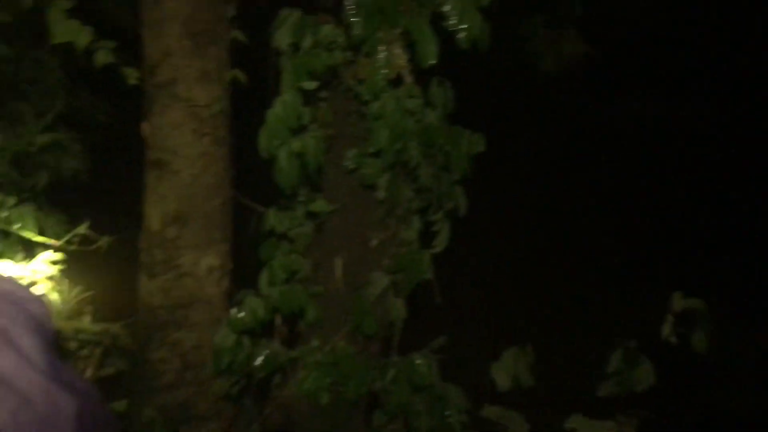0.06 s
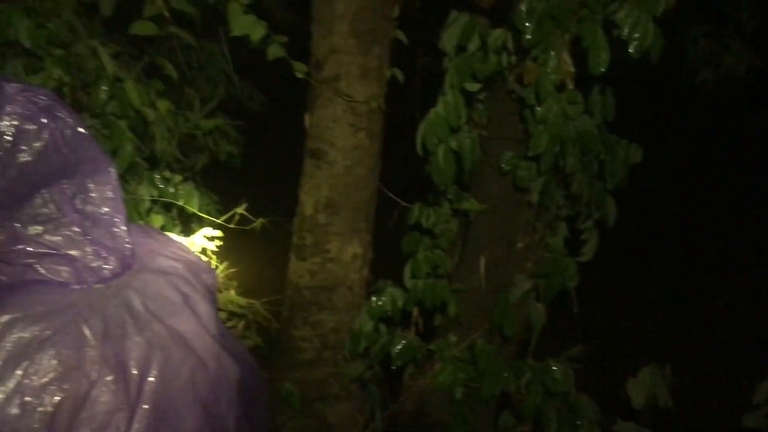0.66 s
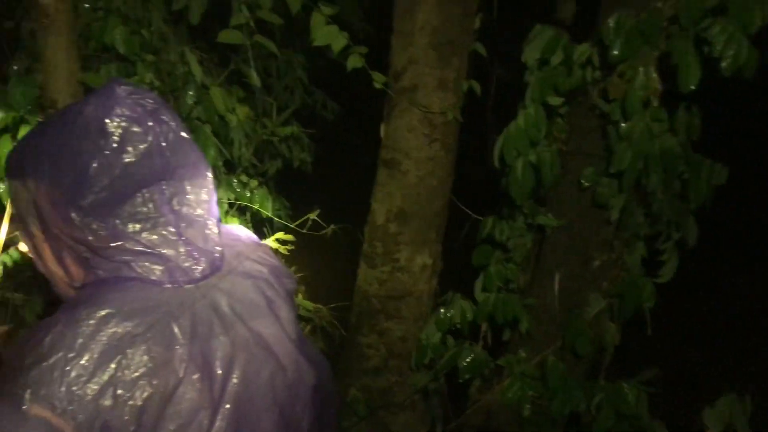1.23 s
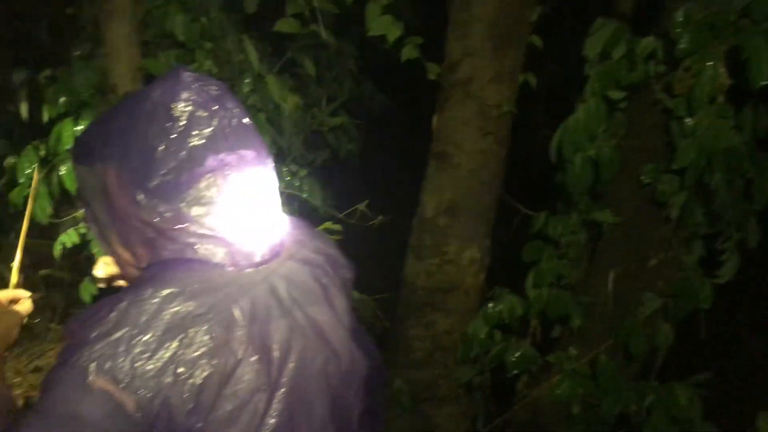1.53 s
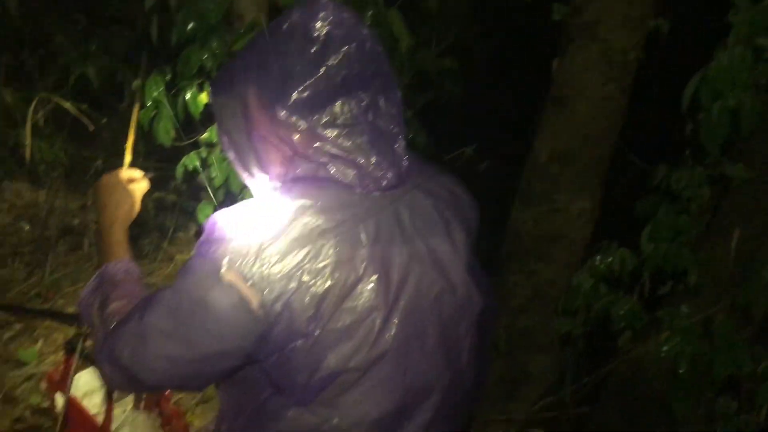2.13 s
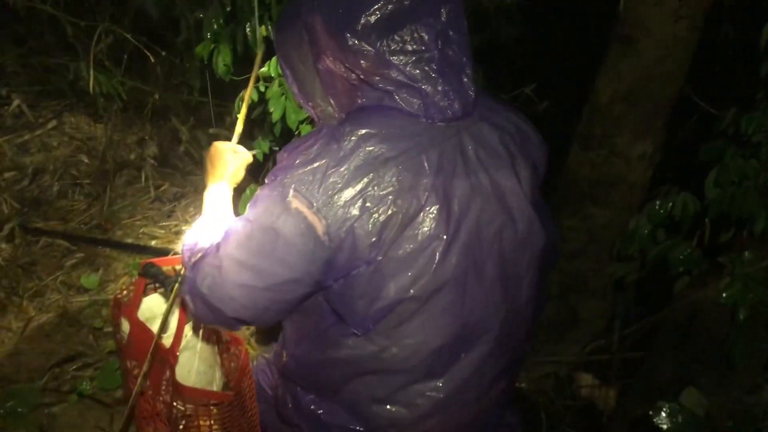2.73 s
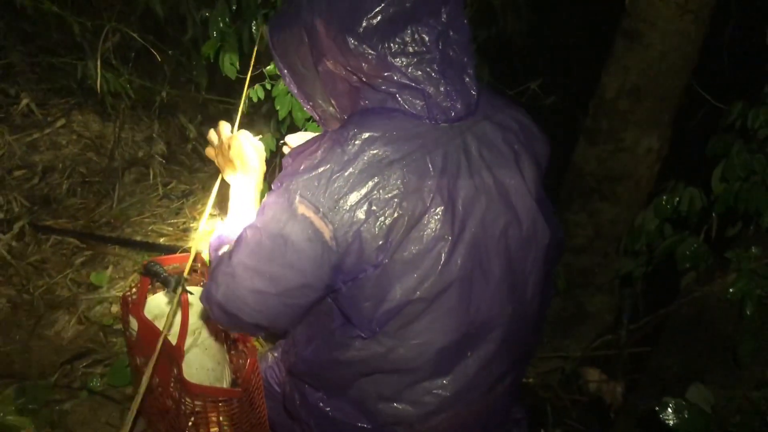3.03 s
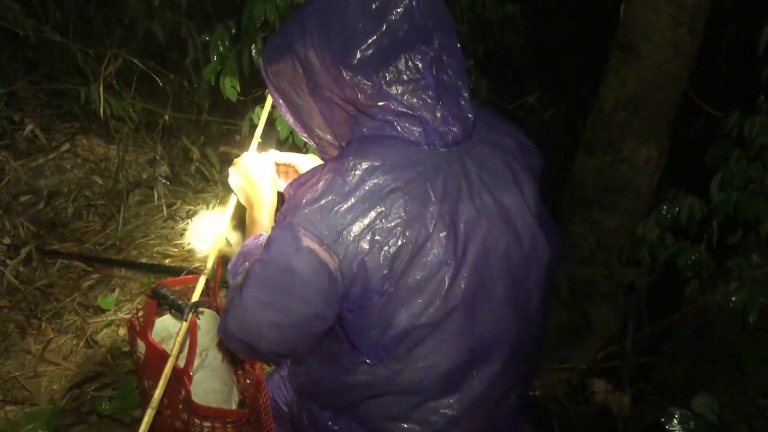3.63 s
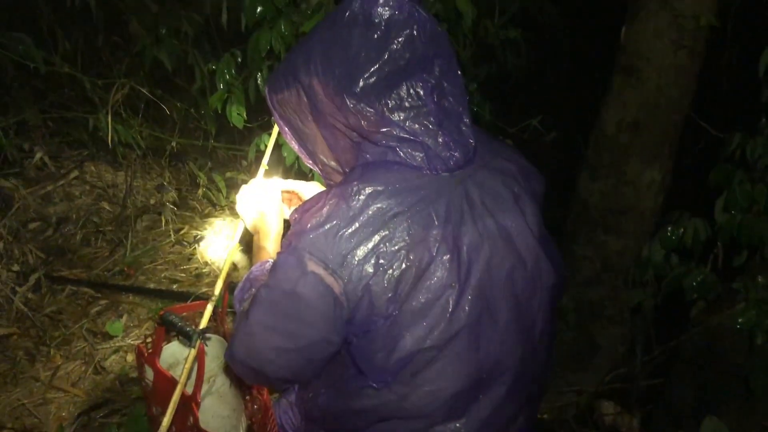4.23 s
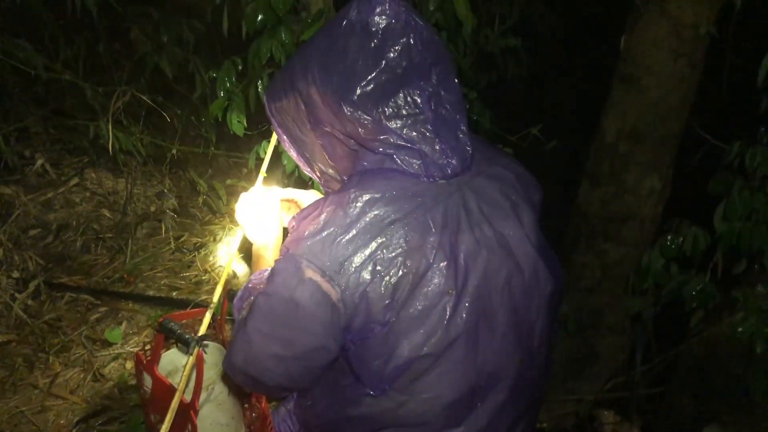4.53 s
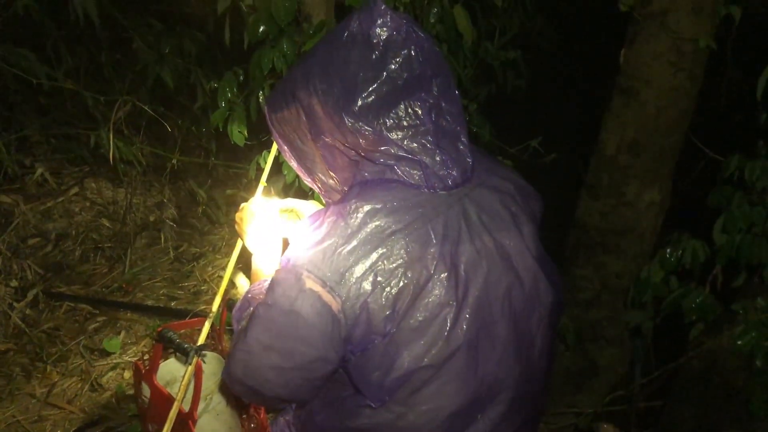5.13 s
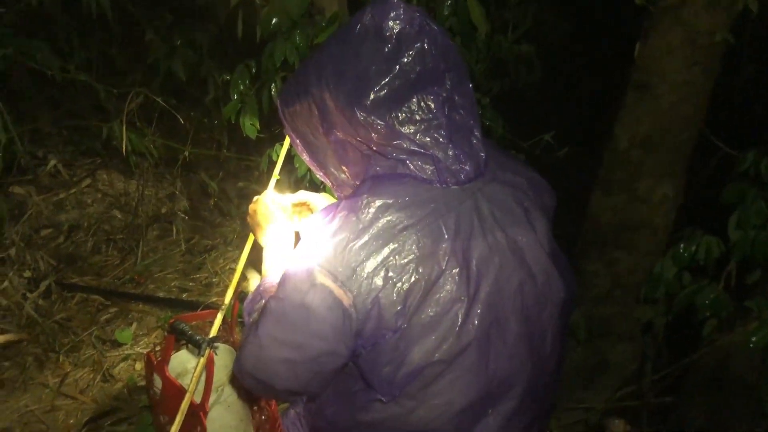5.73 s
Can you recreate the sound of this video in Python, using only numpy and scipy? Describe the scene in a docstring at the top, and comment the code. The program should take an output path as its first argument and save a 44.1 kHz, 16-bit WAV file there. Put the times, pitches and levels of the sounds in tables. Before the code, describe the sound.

Small frogs call throughout in a wood at night, with fast trills, high chirps about five times a second and scattered hoarse peeps, all echoing slightly off the trees. Behind them are a soft hiss of light rain, a far frog chorus, faint insects and a low hum. Close by, drops tap a plastic raincoat, tick on leaves and plink in puddles, and creases in the plastic snap now and then. Soft bumps come between 1 and 2 seconds, and a sleeve rustles from about 2.2 to 2.9 seconds. The trills grow stronger and nearly unbroken from 2.7 seconds. A firm tap lands on the plastic at 3.3 seconds. At 4.2 seconds a heavy drop cracks beside the microphone, the loudest sound, and everything dips for an instant. Dull low thuds cluster from 5.2 to 5.8 seconds as the frogs carry on.

```python
"""A wood at night, in light rain. Small frogs trill, chirp and peep in short whistled notes that echo off
the trees, over a far chorus, insects and a low hum. Drips ring bubbles in puddles. Someone in a plastic
raincoat crouches close by: creases snap and rustle, drops tap the plastic and ring leaves, soft bumps
thud. One heavy drop cracks by the microphone and ducks its gain."""
import sys
import numpy as np
from scipy import signal
from scipy.fft import rfft, irfft
from scipy.io import wavfile

SR = 44100
rng = np.random.default_rng(int(sys.argv[2]) if len(sys.argv) > 2 else 0)


def transcribe(signal):
    """Save signal, clipped to [-1, 1], as a 16-bit WAV file at the path in sys.argv[1]."""
    frames = np.atleast_2d(signal).T
    limited = np.clip(frames, -1, 1)
    pcm = np.round(limited * 32767).astype(np.int16)
    wavfile.write(sys.argv[1], SR, pcm)


N = 259732
TIME = np.arange(N) / SR
TICK_LEAD_S = .000722  # contact ahead of its peak
# Level of the rain hiss, dipping after the heavy drop ducks the gain: time_s, relative_db
HISS_LEVEL = [(0.0, -48), (0.56, -47), (0.97, -49), (2.36, -46), (2.54, -48.5), (3.64, -48.5), (3.85, -47),
              (4.36, -50.5), (5.02, -48), (5.89, -49)]


def from_db(db):
    """Decibels to gain."""
    return 10 ** (np.asarray(db) / 20)


def rms_one(x):
    """Scale to unit power."""
    return x / np.sqrt(np.mean(x ** 2) + 1e-20)


def add(out, start_s, sound):
    """Mix a sound in at start_s."""
    at = int(round(start_s * SR))
    part = sound[max(-at, 0):max(N - at, 0)]
    out[max(at, 0):max(at, 0) + len(part)] += part


def in_time(curve):
    """Control curve at every sample."""
    return np.interp(TIME, *np.transpose(curve))


def drift(per_s):
    """Random wander through knots of spread 1."""
    knots = rng.standard_normal(1024)
    return np.interp(TIME * per_s, np.arange(len(knots)), knots)


def phase_of(hz):
    """Running phase of a pitch curve."""
    return 2 * np.pi * np.cumsum(hz) / SR


def colour(x, points):
    """Shape a spectrum, 41 dB per octave down beyond its ends; rms 1."""
    hz, db = np.transpose(points)
    octave, known = np.log2(np.arange(N // 2 + 1) * SR / N + 1), np.log2(hz)
    beyond = np.abs(octave - np.clip(octave, known[0], known[-1]))
    gain = from_db(np.interp(octave, known, db) - 41 * beyond)
    return rms_one(irfft(rfft(x) * gain, N))


def resonate(x, hz, width_hz):
    """Two-pole resonance."""
    r = np.exp(-np.pi * width_hz / SR)
    return signal.lfilter([1, 0, -1], [1, -2 * r * np.cos(2 * np.pi * hz / SR), r * r], x)


def grains(per_s, spread_db):
    """Random clicks, a few much larger than the rest."""
    sizes = from_db(spread_db * np.minimum(rng.exponential(1, N), 5)) * rng.choice([-1, 1], N)
    return sizes * (rng.random(N) < per_s / SR)


def dispersed(x, lag_s):
    """Bending waves in a thin sheet: delay, lag_s at 1 kHz, shrinks with the root of frequency."""
    root_hz = np.sqrt(np.fft.rfftfreq(len(x), 1 / SR) * 1000)
    return irfft(rfft(x) * np.exp(-4j * np.pi * lag_s * root_hz), len(x))


def ping(hz, q):
    """Narrow ring of one struck spot; peak 1."""
    width_hz = 2 * hz / q
    ring = resonate(resonate(signal.unit_impulse(SR // 40), hz, width_hz), hz, width_hz)
    return ring / np.abs(ring).max()


def fine_ping(spot, low_hz=5530, high_hz=15000):
    """High ring of a tiny spot; spot 0-1 sets the pitch."""
    return ping(low_hz * (high_hz / low_hz) ** spot, q=23)


def crackle(clicks, low_hz, high_hz, q, count):
    """Each click rings one of count facets, each with its own pitch; rms 1."""
    facet, out = rng.integers(0, count, N), np.zeros(N)
    for k, hz in enumerate(np.geomspace(low_hz, high_hz, count)):
        at = np.flatnonzero((facet == k) & (clicks != 0))
        ring = ping(hz, q)[:SR // 100]
        samples = np.minimum(at[:, None] + np.arange(len(ring)), N - 1)
        np.add.at(out, samples, clicks[at, None] * ring)
    return rms_one(out)


def tick(hz, width_hz, lag_s=.001384, soft_hz=2880):
    """A sharp contact rings a spot and spreads through the sheet; dull spots give more softly; peak 1."""
    ring = resonate(signal.unit_impulse(SR // 40), hz, width_hz)
    cushion = signal.butter(2, min(hz + soft_hz, .45 * SR), fs=SR, output="sos")
    sound = dispersed(signal.sosfilt(cushion, ring), lag_s)
    return sound / np.abs(sound).max()


def thud(mid_hz, length_s, fall):
    """Blow on a slack surface, quick ripples first; fall = first / last pitch; gone by 2 * length_s."""
    u = TIME[:int(2 * length_s * SR)] / length_s
    swell = u ** .41 * (1 - u / 2) ** 4
    pitch_hz = mid_hz / np.sqrt(fall) * (1 + (fall - 1) * np.exp(-3.9 * u))
    return swell / swell.max() * np.sin(phase_of(pitch_hz))


def among_trees(x, far_db, near_db, near_t60_s, far_t60_s=.41):
    """Ground and near trunks answer at once; the wood beyond scatters a longer tail."""
    t = TIME[:SR]
    decays = from_db(-60 * t / np.array([[near_t60_s], [far_t60_s]]))
    near, far = rng.standard_normal((2, SR)) * decays * (t > .003)
    echoes = (from_db(near_db) * rms_one(near) + from_db(far_db) * rms_one(far)) / np.sqrt(SR)
    return x + signal.fftconvolve(x, echoes)[:N]


def pulsed_calls(runs, note_s, uneven_db, waver_hz):
    """Even trains of short whistles, each sliding down ever faster."""
    out, u = np.zeros(N), np.linspace(0, 1, int(note_s * SR))
    swell, slide = np.sin(np.pi * u), .5 ** 1.5 - u ** 1.5
    for first_s, last_s, per_s, hz, db, fall_hz in runs:
        count = int(round((last_s - first_s) * per_s)) + 1
        for s in np.linspace(first_s, last_s, count):
            loud, sharp = rng.standard_normal(2)
            whistle = np.sin(phase_of(hz + waver_hz * sharp + fall_hz * slide))
            add(out, s - note_s / 2, from_db(db + uneven_db * loud) * swell * whistle)
    return out


def swells(moves):
    """Half-sine envelope for each movement."""
    return sum(from_db(db) * np.sin(np.pi * np.clip((TIME - start_s) / length_s, 0, 1))
               for start_s, length_s, db in moves)


def rain():
    """Countless drops on foliage merge into hiss and patter."""
    # Foliage spectrum: frequency_hz, relative_db
    spectrum = [(90, -1), (160, -1.5), (280, -8), (600, -7.5), (1000, -6.5), (1800, -8), (2900, -4.5),
                (3400, -4), (4100, -15.5), (4800, -17.5), (5500, -29), (7000, -26)]
    patter = rms_one(dispersed(grains(per_s=350, spread_db=3.4), lag_s=.003))
    level_db = in_time(HISS_LEVEL) + 4 + 1.13 * drift(25)
    return from_db(level_db) * colour(rng.standard_normal(N) + .5 * patter, spectrum)


def coat_crinkle():
    """Rain on the coat: hiss, and creases snapping in clumps at a wandering rate."""
    # Plastic spectrum: frequency_hz, relative_db
    spectrum = [(4000, 6), (5500, 1.5), (7000, -4), (8000, -5.5), (9000, -4.5), (10200, -7), (12500, -9.5),
                (15500, -6)]
    clumps = from_db(3 * np.clip(drift(70), -2, 1.6))
    clicks = grains(per_s=900 * from_db(4 * drift(9)), spread_db=3.2) * clumps
    creases = crackle(clicks, low_hz=4000, high_hz=15500, q=3, count=12)
    level_db = in_time(HISS_LEVEL) - 7.5 + .94 * drift(40)
    return from_db(level_db) * colour(rng.standard_normal(N) + np.sqrt(.5) * creases, spectrum)


def far_chorus(count=110, pulses_per_s=29.4, low_hz=3360, high_hz=3786, fall_hz=260):
    """Far frogs trill at random, each on its own pitch, over a blur of countless more."""
    # Chorus spectrum: frequency_hz, relative_db
    spectrum = [(3000, -7), (3250, -13), (3500, 0.5), (3700, -0.5), (3830, -4.5), (3950, -6)]
    # Swell and ebb: time_s, relative_db
    levels = [(0.0, -50), (0.23, -45.5), (0.79, -51.5), (1.2, -45.5), (1.54, -45), (2.56, -45), (3.08, -42),
              (4.82, -49.5), (5.89, -37.5)]
    runs = []
    for when, length, pitch in rng.random((count, 3)):
        end_s, hz = when * N / SR, low_hz + pitch * (high_hz - low_hz)
        runs.append((end_s - length / 2, end_s, pulses_per_s, hz, 0, fall_hz))
    calls = pulsed_calls(runs, note_s=.016, uneven_db=2, waver_hz=60)
    calls = rms_one(among_trees(calls, far_db=-3.5, near_db=-2.5, near_t60_s=.042))
    blur = rng.standard_normal(N)
    return from_db(in_time(levels) - 2) * colour(blur + from_db(8) * calls, spectrum)


def hum(pitch_hz=75):
    """Low wavering tone in a band of rumble."""
    # Rumble spectrum: frequency_hz, relative_db
    spectrum = [(25, -38), (50, -12.5), (66, -6.5), (75, 0), (86, -20), (110, -22)]
    # Hum strength: time_s, relative_db
    levels = [(0.0, -59.5), (2.23, -62.5), (2.92, -66), (3.44, -61), (4.25, -57), (4.33, -53), (5.15, -65),
              (5.35, -56), (5.68, -53), (5.89, -51)]
    drone = np.sqrt(2) * np.sin(phase_of(pitch_hz + 2 * drift(12))) * from_db(2 * drift(9))
    rumble = from_db(3) * colour(rng.standard_normal(N), spectrum)
    return from_db(in_time(levels) + 4) * (drone + rumble)


def insects():
    """Far stridulators merge into narrow, gently fluttering bands."""
    # Shrill bands: centre_hz, width_hz, level_db
    bands = [(5940, 310, -71.5), (7510, 360, -75), (8860, 860, -72.5)]
    out = np.zeros(N)
    for hz, width_hz, db in bands:
        band = resonate(resonate(rng.standard_normal(N), hz, width_hz), hz, width_hz)
        out += from_db(db + drift(22)) * rms_one(band)
    return out


def spatters(per_s=10):
    """Fine drops tick at random on leaves and hood."""
    out = np.zeros(N)
    for when, spot, chance in rng.random((int(per_s * N / SR), 3)):
        peak_db = -59.5 - 3.5 * np.log(max(chance, .02))
        add(out, when * N / SR, from_db(peak_db) * fine_ping(spot))
    return out


def chirping_frog(pitch_hz=4765, step_hz=50, fall_hz=850, note_gap_s=.0375, turned_s=2.9, t60_s=.25):
    """Three sliding notes a call; fainter and more blurred as the microphone turns away."""
    # Calling bouts: first_call_s, last_call_s, gap_s
    bouts = [(-.035, 0.352, .192), (0.578, 0.958, .192), (1.186, 1.455, .266), (1.646, 1.874, .229),
             (2.062, 2.451, .193), (2.671, 3.592, .229), (3.787, 4.454, .225), (4.655, 4.873, .225),
             (5.076, 5.722, .22)]
    # Sound arriving by way of the trees: time_s, power_share
    scattered = [(1.8, .2), (2.2, .7), (3.1, .92)]
    runs = []
    for first_s, last_s, gap_s in bouts:
        for call_s in np.linspace(first_s, last_s, int(round((last_s - first_s) / gap_s)) + 1):
            db = np.interp(call_s, [0, turned_s], [-45, -48.5])
            for k in (-1, 0, 1):
                s = call_s + note_gap_s * (1 + k)
                runs.append((s, s, 0, pitch_hz + k * step_hz, db - .1 * k, fall_hz))
    notes = pulsed_calls(runs, note_s=.019, uneven_db=1.3, waver_hz=100)
    notes = among_trees(notes, far_db=-16, near_db=-7, near_t60_s=.03)
    t = TIME[:SR // 2]
    echoes = rng.standard_normal(len(t)) * from_db(-60 * t / t60_s)
    blur = signal.fftconvolve(notes, echoes / np.linalg.norm(echoes))[:N]
    share = in_time(scattered)
    return np.sqrt(1 - share) * notes + np.sqrt(share) * blur


def puddle_drips(ring_s=.002, wobble=.06):
    """A trapped bubble rings briefly; its pitch wobbles and slides."""
    # Bubbles: start_s, relative_db, pitch_hz, rise_share
    bubbles = [(.013, -38, 2640, -0.019), (1.152, -38, 2740, -0.014), (1.317, -40, 2860, 0.21),
               (1.423, -37, 2780, 0.12), (1.681, -34, 2860, .04), (2.859, -39.5, 2880, .04),
               (4.912, -44, 2330, 0.0068), (5.103, -41, 1640, 0.022), (5.314, -38.5, 2950, -0.017)]
    out, u = np.zeros(N), TIME[:SR // 40] / ring_s
    for s, db, hz, rise in bubbles:
        pitch_hz = hz * (1 + rise * np.tanh(u / 2 - 1) + wobble * drift(1200)[:len(u)])
        add(out, s, from_db(db) * u * np.exp(1 - u) * np.sin(phase_of(pitch_hz)))
    return among_trees(out, far_db=-14, near_db=-5, near_t60_s=.047)


def trilling_frogs():
    """Fast trains of falling whistles among the trees."""
    # Trills: first_pulse_s, last_pulse_s, pulses_per_s, pitch_hz, relative_db, pulse_fall_hz
    runs = [(.032, .235, 29.5, 3490, -35, 260), (.165, .265, 30, 3740, -41, 100),
            (.515, .55, 30, 3720, -43, 100), (.972, 1.206, 29.9, 3440, -37, 300),
            (1.232, 1.443, 28.5, 3420, -34.5, 484), (1.526, 1.836, 29.4, 3360, -34.5, 520),
            (1.873, 1.977, 29, 3360, -39, 480), (2.008, 2.178, 29.5, 3466, -35.5, 240),
            (2.733, 3.132, 30, 3530, -32, 150), (3.167, 3.805, 29.8, 3520, -31, 150),
            (3.843, 4.158, 28.4, 3490, -32.5, 150), (4.192, 4.482, 27.5, 3446, -35.5, 150),
            (4.517, 4.919, 29.6, 3576, -39, 150), (4.955, 5.886, 30.1, 3514, -31, 169)]
    calls = pulsed_calls(runs, note_s=.013, uneven_db=1.2, waver_hz=20)
    return among_trees(calls, far_db=-5, near_db=-12, near_t60_s=.022)


def peeping_frogs(rise_s=.006, sag=.006, droop=.014, rough=.019, trunk_echo_s=.058, trunk_echo_db=-18):
    """Short, hoarse, drooping notes; the vocal sac lifts the fifth partial far above the rest."""
    # Peeps: start_s, fifth_partial_hz, relative_db, length_s
    peeps = [(0.295, 3580, -33.5, 0.026), (0.728, 3860, -42.5, 0.038), (0.805, 3820, -35, 0.042),
             (1.019, 3698, -26, 0.042), (1.453, 3735, -33, 0.045), (2.281, 3835, -34.5, 0.039),
             (2.509, 3655, -24.5, 0.027), (2.703, 3810, -33, 0.027), (3.233, 3755, -37.5, 0.036),
             (4.071, 3840, -36, 0.05), (4.447, 3820, -37.5, 0.036), (4.503, 3680, -30.5, 0.033),
             (4.888, 3760, -36.5, 0.043), (5.734, 3860, -36, 0.048), (5.781, 3684, -27.5, 0.038)]
    # Voice partials: harmonic_number, relative_db
    partials = [(3, -15), (4, -17), (5, 0), (6, -26)]
    out = np.zeros(N)
    for s, hz, db, length_s in peeps:
        t = TIME[:int(length_s * SR)]
        u = t / length_s
        swell = (1 - np.exp(-(t / rise_s) ** 2)) * np.cos(np.pi * u ** 2 / 2)
        bend = 1 - sag * (u - .5) - droop * np.maximum(2 * u - 1, 0) ** 2
        phase = phase_of(hz / 5 * (bend + rough * drift(221)[:len(t)]))
        voice = sum(from_db(partial_db) * np.sin(k * phase) for k, partial_db in partials)
        note = from_db(db) * swell * voice
        add(out, s, note)
        add(out, s + trunk_echo_s, from_db(trunk_echo_db) * note)
    return among_trees(out, far_db=-5.5, near_db=-9.5, near_t60_s=.061)


def plastic_taps(click_q=.93):
    """Drops hit taut plastic: a quick thud and a click."""
    # Drops: time_s, thud_db, mid_pitch_hz, length_cycles, fall_ratio, click_db, click_hz
    taps = [(.298, -38, 780, 4.8, 4.3, -26, 2000), (1.319, -30.5, 774, 2.2, 2.6, -32, 2600),
            (1.875, -38, 1510, 5.6, 0.86, -28, 1890), (1.922, -31.5, 895, 2.6, 3.8, -26.5, 2380),
            (2.04, -46, 1400, 2.6, 3.8, -29, 1500), (2.624, -37, 1080, 7, 1.6, -28, 1700),
            (2.6462, -30, 870, 4.1, 3.9, -26, 2400), (2.905, -39, 1500, 3.2, 2, -27, 2400),
            (2.927, -23, 980, 4, 3, -29, 3000), (2.968, -32, 730, 3.9, 6.5, -24.5, 2800),
            (3.2925, -17.5, 600, 2.9, 8.1, -26, 1780), (3.603, -29.5, 404, 1.6, 7.2, -30.5, 2000),
            (3.861, -34, 340, 3, 6.7, -33, 5000), (5.213, -35.5, 550, 3.8, 1.1, -30, 1300),
            (5.351, -32, 900, 2.1, 3.8, -27, 1760)]
    out = np.zeros(N)
    for s, thud_db, hz, cycles, fall, click_db, click_hz in taps:
        add(out, s, from_db(thud_db) * thud(hz, cycles / hz, fall))
        add(out, s - TICK_LEAD_S, from_db(click_db) * tick(click_hz, click_hz / click_q))
    return out


def impact_rings():
    """Short pitched rings: drops on leaves, and the ringing of the plastic taps and heavy drop."""
    # Rings: time_s, peak_db, pitch_hz, q
    rings = [(0.298, -19, 4220, 11), (.349, -34, 15500, 24), (.849, -33, 9150, 15), (0.851, -39, 14700, 24),
             (.857, -24, 3400, 10), (1.555, -37, 7000, 8.8), (1.598, -37, 6200, 5.8),
             (1.876, -37, 15300, 18), (2.247, -33, 3720, 9), (2.338, -31, 2290, 7), (2.425, -31, 1460, 5),
             (2.6465, -41, 6860, 12), (2.927, -35, 13900, 10), (2.968, -29, 4400, 9.2),
             (3.289, -25, 3100, 10), (3.2921, -17, 1730, 4.2), (3.2928, -25, 6200, 13),
             (3.2926, -27, 4100, 8), (4.193, -24.5, 3340, 13), (4.2201, -18, 800, 2.2),
             (4.231, -28, 1290, 4.9), (4.993, -32.5, 7340, 13), (5.19, -42, 10200, 14),
             (5.209, -36, 14200, 14), (5.739, -36, 4150, 14), (5.841, -29, 4700, 10)]
    out = np.zeros(N)
    for s, db, hz, q in rings:
        add(out, s - TICK_LEAD_S, from_db(db) * ping(hz, q))
    return out


def coat_snaps(fold_window_s=.012, fold_db=-11.5):
    """A crease gives with a bright tick; four folds beside it go too, each on its own pitch."""
    # Creases: time_s, peak_db
    snaps = [(0.301, -34.5), (1.810, -32.5), (3.643, -39), (4.766, -37), (5.204, -31)]
    out = np.zeros(N)
    for s, db in snaps:
        add(out, s - TICK_LEAD_S, from_db(db) * tick(hz=9200, width_hz=12000))
        for when, spot in rng.random((4, 2)):
            add(out, s + (when - .5) * fold_window_s, from_db(db + fold_db) * fine_ping(spot))
    return out


def bumps():
    """Soft blows near the microphone; low ones tend to last longer."""
    # Blows: start_s, peak_db, mid_pitch_hz, length_cycles, fall_ratio
    blows = [(1.043, -39.5, 190, 4.3, 2.8), (1.306, -42.5, 230, 3.3, 1.05), (1.562, -38.5, 214, 3.1, 3.5),
             (1.616, -37, 370, 6.4, 1.9), (1.636, -32.5, 258, 5.5, 1.5), (1.792, -34, 263, 2.3, 2.9),
             (2.037, -40, 165, 2.1, 2.6), (3.293, -28, 250, 1.9, 2.4), (3.821, -33.5, 128, 3.9, 2),
             (4.319, -33, 181, 6.5, 3.2), (5.188, -32, 118, 5.8, 2.6), (5.228, -18.5, 59.6, 2.46, 2.4),
             (5.298, -34.5, 275, 4.9, 1.4), (5.434, -32.5, 68, 2.9, 2.2), (5.459, -35, 210, 2.5, 0.98),
             (5.468, -23.5, 83, 4.9, 2.8), (5.495, -24, 233, 5.4, 2.2), (5.540, -33, 165, 4.3, 1.6),
             (5.75, -33.5, 76, 2.9, 2.4)]
    out = np.zeros(N)
    for s, db, hz, cycles, fall in blows:
        add(out, s, from_db(db) * thud(hz, cycles / hz, fall))
    return out


def scuffs():
    """Some bumps drag with a dull rub."""
    # Drags: start_s, length_s, level_db
    drags = [(1.622, 0.053, -39), (5.295, .025, -41)]
    # Rub spectrum: frequency_hz, relative_db
    spectrum = [(110, 1), (300, -1), (480, -9)]
    return swells(drags) * colour(rng.standard_normal(N), spectrum)


def rustles():
    """Sleeve and leaves brush in separate little crinkles as the arm moves."""
    # Arm movements: start_s, length_s, level_db
    moves = [(2.17, 0.26, -44.5), (2.591, 0.073, -49), (2.841, 0.11, -53)]
    # Rustle spectrum: frequency_hz, relative_db
    spectrum = [(1200, -10), (2700, 12), (4500, -11)]
    slips = crackle(grains(per_s=330, spread_db=2.2), low_hz=1300, high_hz=4500, q=5, count=14)
    return swells(moves) * colour(slips, spectrum)


def heavy_drop(time_s=4.2187, ring_delay_s=.00182):
    """A drop lands by the microphone: a hard crack, then hollow modes that sag as they die."""
    # Crack bands: centre_hz, width_hz, peak_db
    crack = [(3580, 4900, -2), (13700, 2600, -13)]
    # Hollow ring: mid_pitch_hz, peak_db, length_s
    modes = [(87, -20, 0.037), (161, -15.5, 0.03), (259, -5, 0.02), (368, -14, 0.021), (490, -8, 0.013),
             (734, -12, 0.011), (1065, -18, 0.0075)]
    out = np.zeros(N)
    for hz, width_hz, db in crack:
        add(out, time_s - TICK_LEAD_S, from_db(db) * tick(hz, width_hz, lag_s=.001266, soft_hz=3000))
    for hz, db, length_s in modes:
        add(out, time_s + ring_delay_s, from_db(db) * thud(hz, length_s, fall=1.17))
    return out


def duck(x, threshold_db, release_db_per_s, attack_s=.00083):
    """Gain control: a loud peak pulls the gain down, then it recovers."""
    over_db = np.maximum(20 * np.log10(np.abs(x) + 1e-9) - threshold_db, 0)
    release_db = release_db_per_s * TIME
    held_db = np.maximum.accumulate(over_db + release_db, axis=-1) - release_db
    r = np.exp(-1 / (attack_s * SR))
    return x * from_db(-signal.lfilter([1 - r], [1, -r], held_db))


def scene():
    """Frogs off among the trees, drops and bumps close by; mono."""
    frogs = from_db(-3) * trilling_frogs() + from_db(3.5) * chirping_frog()
    frogs += from_db(-1) * peeping_frogs()
    puddles = from_db(6.5) * puddle_drips()
    drops = plastic_taps() + impact_rings() + heavy_drop()
    person = bumps() + coat_snaps() + rustles() + scuffs()
    backdrop = rain() + coat_crinkle() + far_chorus() + hum() + insects() + spatters()
    return (frogs + puddles + drops + person + backdrop)[None]


def record(dry, cutoff_hz=15900):
    """Gain control, then a steep low-pass."""
    lowpass = signal.ellip(12, .1, 80, cutoff_hz, fs=SR, output="sos")
    return signal.sosfilt(lowpass, duck(dry, threshold_db=-7, release_db_per_s=156))


dry = scene()
out = record(dry)
transcribe(out)
```